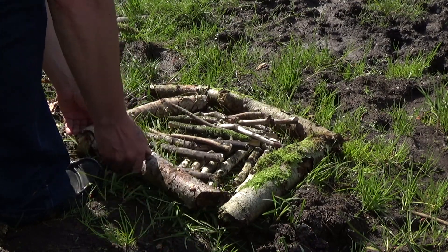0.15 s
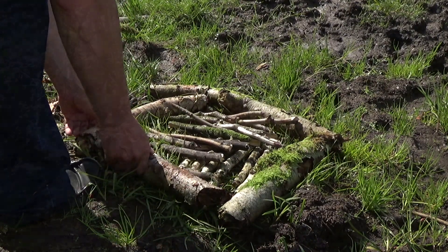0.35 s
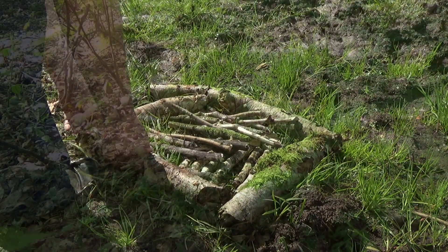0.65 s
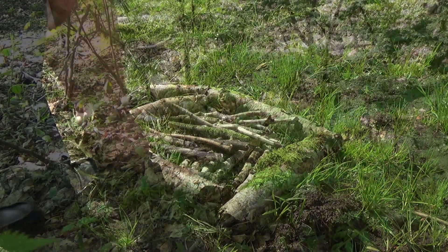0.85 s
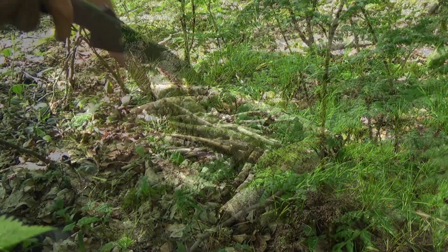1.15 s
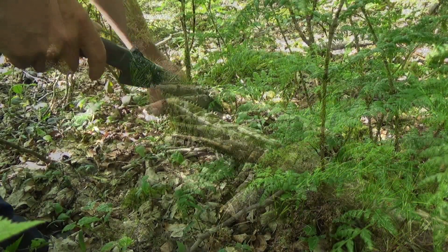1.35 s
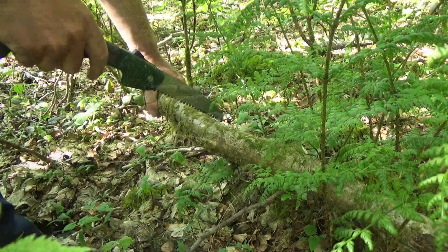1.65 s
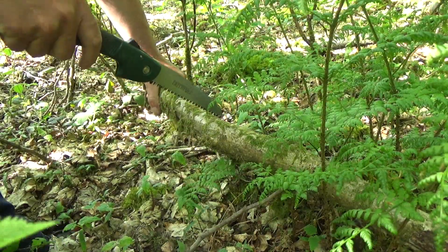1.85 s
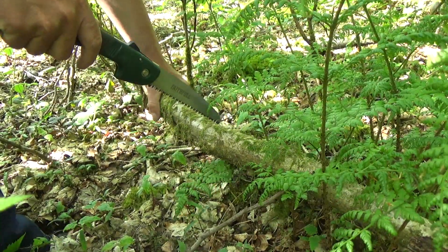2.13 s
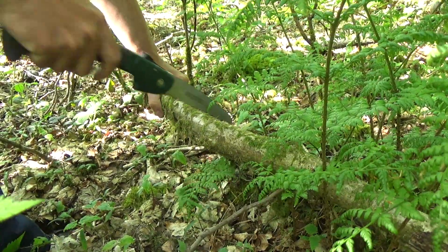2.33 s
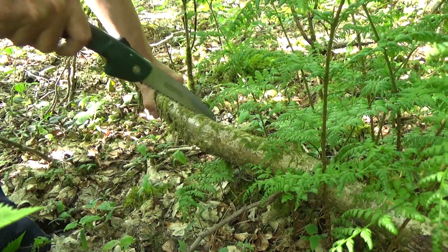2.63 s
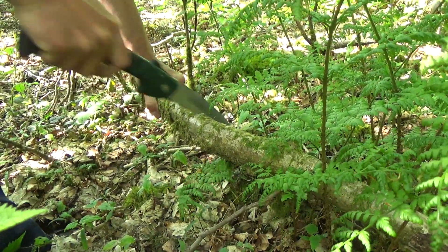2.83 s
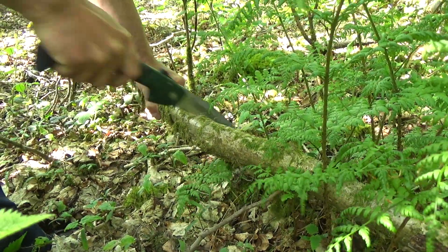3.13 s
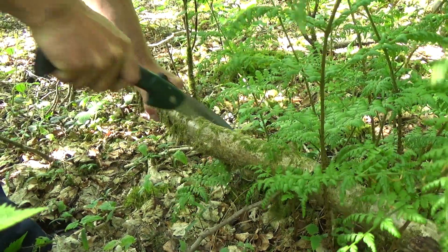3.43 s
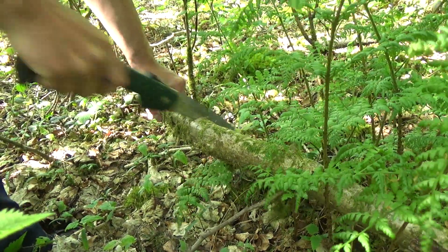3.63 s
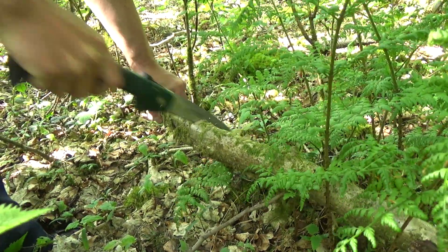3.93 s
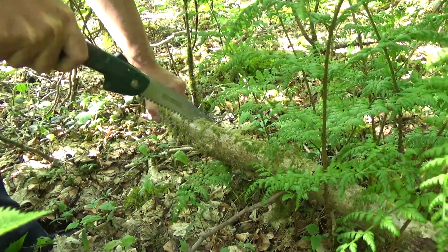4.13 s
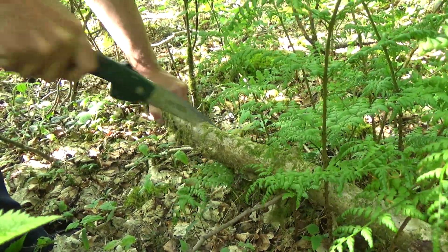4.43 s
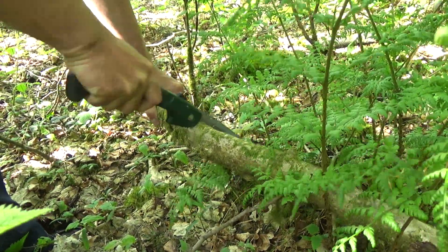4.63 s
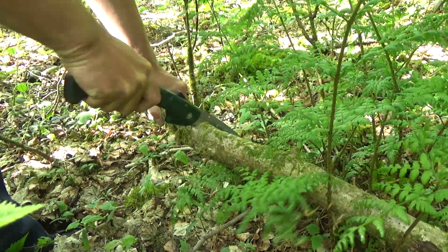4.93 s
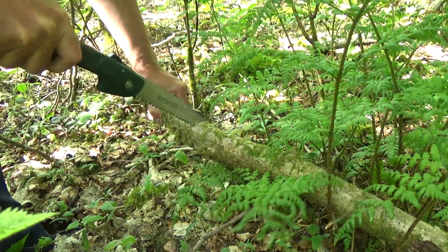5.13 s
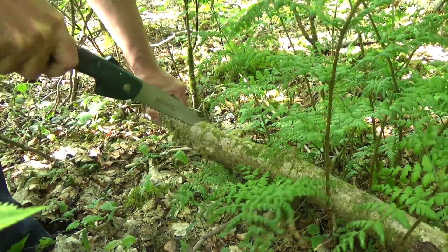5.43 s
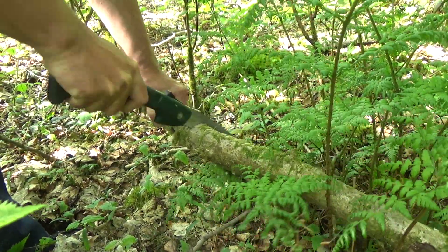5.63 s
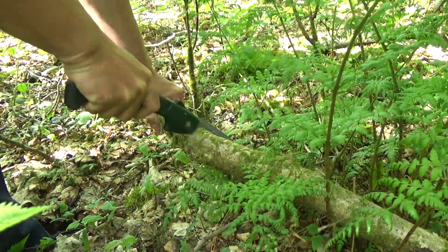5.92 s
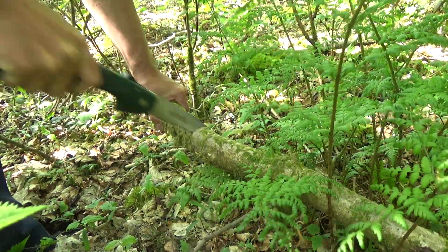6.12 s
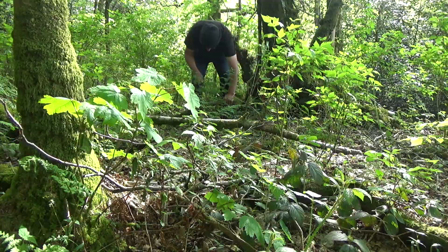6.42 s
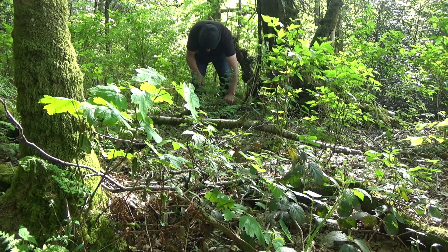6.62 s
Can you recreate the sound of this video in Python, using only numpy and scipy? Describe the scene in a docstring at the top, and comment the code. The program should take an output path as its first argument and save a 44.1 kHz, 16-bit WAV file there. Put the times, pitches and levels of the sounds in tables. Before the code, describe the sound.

Close stereo sound on a forest floor: faint breeze, leaves stirred by hands and feet, crisp twig ticks and high, sliding bird notes. Then quick sawing takes over, alternating bright, rasping pulls with return pushes that carry a short, nasal judder. Small clicks mark snagging teeth. Near the end a soft dull thump comes, and the saw drops back, faint, with a thin woodland echo.

```python
"""On a forest floor, a folding hand saw cuts a mossy branch with about three strokes to and fro a second. First
leaves rustle, twigs snap and a bird whistles gliding tones. Tooth pulses at a rate set by the blade's speed
excite resonances of wood and blade; noise and tiny random fractures make the fibres hiss. The thin blade rings
and, on most pushes, judders. The last strokes sound quieter and more hollow. Air noise lies behind all this,
first over grass, then in the crowns; the trees return diffuse tails."""
import sys
import numpy as np
from scipy import signal
from scipy.fft import rfft, irfft, next_fast_len
from scipy.io import wavfile
from scipy.ndimage import uniform_filter1d

SR = 44100
rng = np.random.default_rng(int(sys.argv[2]) if len(sys.argv) > 2 else 0)


def unload_audio(sound):
    """Save the sound as a 16-bit wav file, at the path given as the first command line argument."""
    columns = np.transpose(np.atleast_2d(sound))
    # keep every value between -1 and 1, then stretch to whole-number steps
    steps = np.round(np.clip(columns, -1, 1) * 32767)
    wavfile.write(sys.argv[1], SR, steps.astype(np.int16))


N = 298557
T = np.arange(N) / SR  # time in seconds
SIZE = next_fast_len(N + SR // 4, True)  # transform length, with room for tails
HZ = np.arange(SIZE // 2 + 1) * SR / SIZE + 1e-3  # kept above 0 for logarithms and ratios
SOFTER_FROM_S = 6.37  # from here on the saw sounds quieter, with a longer echo


def undb(db):
    """Level: turns decibels into an amplitude ratio."""
    return np.exp(np.asarray(db) * (np.log(10) / 20))


def unit(x):
    """Normalisation: scales to a root-mean-square of 1."""
    return x / np.sqrt(np.mean(np.abs(x) ** 2))


def through(x, response):
    """Linear filtering: multiplies the spectrum by a frequency response."""
    return irfft(rfft(x, SIZE) * response, SIZE)[..., :N]


def colour(points):
    """Spectral envelope: gain through (Hz, dB) points on a log-frequency axis."""
    hz, db = np.transpose(points)
    return undb(np.interp(np.log(HZ), np.log(hz), db))


def band(hz, width):
    """Simple resonance: response of one damped mode, with its width in Hz."""
    return 1 / (1 + 1j * (HZ / hz - hz / HZ) * hz / width)


def edges(low_hz, top_hz):
    """Radiation limits: a band-pass for an object that radiates mainly between two frequencies."""
    return signal.freqs(*signal.butter(3, [low_hz, top_hz], "band", analog=True), HZ)[1]


def body(modes, low_hz, top_hz):
    """Modal superposition: an object's resonances together, keeping the power of white noise."""
    resonances = sum(undb(db) * band(hz, width) for hz, width, db in modes)
    return unit(edges(low_hz, top_hz) * resonances)


def walk(rate):
    """Random modulation: a smoothed chance value, about `rate` new draws a second, rms 1."""
    size = int(SR / rate)
    steps = np.repeat(rng.standard_normal(N // size + 1), size)[:N]
    return unit(uniform_filter1d(steps, size))


def crackle(per_s, spread_db):
    """Shot noise: tiny fractures at random moments, of very unequal size."""
    happens = rng.random(N) < per_s / SR
    sizes = undb(spread_db * rng.standard_normal(N).clip(-2, 2))
    return unit(happens * rng.choice([-1, 1], N) * sizes)


def burst(t60):
    """Exponential decay: noise that falls 60 dB in t60 seconds."""
    age = T[:SR // 5]
    return .5 * rng.standard_normal(len(age)) * undb(-60 * age / t60)


def add(track, start, sound):
    """Superposition: mixes a short sound into a track at a time in seconds."""
    part = track[int(start * SR):][:len(sound)]
    part += sound[:len(part)]


def tooth_pulses(turns, scatter_db):
    """Periodic impact: one blow of its own strength each time a tooth passes."""
    at = np.flatnonzero(np.diff(np.floor(turns)) > 0)
    rate = turns[at + 1] - turns[at]  # teeth per sample
    late = (1 - turns[at] % 1) / rate
    size = undb(scatter_db * rng.standard_normal(N)[at]) / np.sqrt(rate)
    pulses = np.zeros(N)
    # each blow is shared between two samples to place it exactly
    pulses[at] += size * (1 - late)
    pulses[at + 1] += size * late
    return pulses


# the teeth sink through moss and bark into firm wood, which then answers more and more
BARK_DB, SINK_S = (-39, -5, -2.5), .24  # (wood, blade, fibre) change on the first push; time constant
LATE_DB = (-13, -18.5, -18)  # (wood, blade, fibre) change in the last strokes


def motion(strokes, peak, glide, lean_db):
    """Kinematics: blade speed 0-1, teeth passed so far, and the wood, blade and fibre gains.
    `peak` is the share of the stroke at which the blade is fastest."""
    speed, rate, db = np.zeros(N), np.zeros(N), np.zeros((3, N))
    for start, end, tooth_hz, force_db, *_ in strokes:
        now = slice(int(start * SR), int(end * SR))
        fastest = start + peak * (end - start)
        travel = np.interp(T[now], [start, fastest, end], [0, .5, 1])
        speed[now] = np.sin(np.pi * travel).clip(0)
        rate[now] = tooth_hz
        bark = np.exp(-(start - PUSHES[0][0]) / SINK_S)
        db[:, now] = force_db + bark * np.array(BARK_DB)[:, None]
        db[0, now] += lean_db * (travel - .5)  # the arm leans on the wood more as a stroke goes on
    turns = np.cumsum(rate * speed ** glide) / SR
    return speed, turns, undb(db + np.outer(LATE_DB, T > SOFTER_FROM_S))


# Modes of the taut blade.
# Each row: middle tuning in Hz, width in Hz, relative level in dB.
BLADE_MODES = [(430, 190, -16.5), (1310, 140, -17.5), (2024, 280, -6.5), (2374, 440, -6), (2766, 210, 0.5),
               (2962, 76, 7), (3056, 37, -5), (3920, 710, -9.5)]


def blade_ring(drive, shift):
    """Modal resonance: the blade's modes wander between a lower and a higher tuning.
    The cut grips the blade at changing places; `shift` is the detuning as a share of the frequency."""
    grip = np.pi / 4 * (1 + np.tanh(walk(22)))
    lower = [(hz * (1 - shift), width, db) for hz, width, db in BLADE_MODES]
    higher = [(hz * (1 + shift), width, db) for hz, width, db in BLADE_MODES]
    low_ring = through(drive * np.cos(grip), body(lower, 276, 4200))
    high_ring = through(drive * np.sin(grip), body(higher, 230, 3700))
    return low_ring + high_ring


# Spectrum of breaking wood fibres, also used for the clicks of snagging teeth.
# Each row: frequency in Hz, relative density in dB per Hz.
FIBRE_SPECTRUM = [(150, -32.5), (400, -41), (1500, -12), (3500, -4), (5000, -1.5), (6200, 0), (7400, -1.5),
                  (8500, 2.5), (9200, 0), (9900, 2.5), (11000, -3), (12200, -0.5), (14000, -8.5),
                  (16000, -15)]


def cutting(speed, turns, gains, wood_body, jitter, scatter_db, tearing, bite, wood_db, blade_db, fibre_db):
    """Forced vibration: teeth knock on the branch, and each tears a spray of fibres.
    The fibres hiss and, with the teeth, set the blade ringing."""
    wood, blade, fibre = gains
    turns = turns + jitter * speed * walk(300)  # uneven grain holds the teeth back
    teeth = tooth_pulses(turns, scatter_db)
    # fibres break most just after a tooth bites; at low speed each tooth stands out more
    bite = bite * (2 - speed)
    after_bite = undb(-bite * 20 * (turns % 1 - .5))
    spray = after_bite * undb(2.24 * walk(260)) / (1 + bite)
    blows = teeth + tearing * spray * rng.standard_normal(N)
    knock = through(blows * wood * speed ** 2.4, wood_body)
    blade_drive = 0.33 * teeth + 0.73 * spray * crackle(9000, 3.6)
    ring = blade_ring(blade_drive * blade * speed ** 1.096, shift=0.02)
    fractures = spray * crackle(20000, 3.6)
    hiss = through(fractures * fibre * speed ** 1.27, unit(colour(FIBRE_SPECTRUM)))
    return undb(wood_db) * knock + undb(blade_db) * ring + undb(fibre_db) * hiss


# Cutting strokes.
# Each row: start in seconds, end in seconds, top tooth rate in Hz, force in dB.
PULLS = [(2.49, 2.656, 280.1, -1.5), (2.812, 2.965, 282.3, 0.5), (3.128, 3.291, 344, .5),
         (3.441, 3.582, 322, .5), (3.745, 3.887, 357, 1), (4.054, 4.19, 320.3, 0),
         (4.384, 4.53, 339.8, -.5), (4.68, 4.834, 340, 0), (5.016, 5.168, 333, 0),
         (5.326, 5.487, 326.9, -1), (5.686, 5.828, 363.6, -.5), (5.979, 6.122, 376.6, .5),
         (6.294, 6.419, 354, 0), (6.617, 6.76, 377, -1)]
# Modes of the branch on the cutting stroke.
# Each row: frequency in Hz, width in Hz, relative level in dB.
WOOD_PULLED = [(255, 70, -9), (365, 100, 1), (550, 150, 2.5), (688, 120, -2), (1020, 139.4, -2.5),
               (1306, 190, 0), (1870, 443, -4)]


def pulls():
    """Forced vibration under tension: on the cutting stroke the blade is taut and the teeth bite deep."""
    speed, turns, gains = motion(PULLS, peak=.53, glide=.86, lean_db=4)
    return cutting(speed, turns, gains, body(WOOD_PULLED, 172, 2340), jitter=0.028, scatter_db=3.0,
                   tearing=0.25, bite=0.17, wood_db=-22.3, blade_db=-19.3, fibre_db=-18.5)


# Return strokes.
# Each row: start in seconds, end in seconds, top tooth rate in Hz, force in dB,
# middle of the judder in seconds (0 for none), spread of the judder in seconds.
PUSHES = [(2.31, 2.478, 395, -.5, 0, 0), (2.666, 2.807, 341.2, -1.5, 0, 0.00012),
          (2.993, 3.129, 304.2, 0, 3.057, .0066), (3.289, 3.435, 420, -.5, 3.366, 0.0055),
          (3.605, 3.756, 411.8, -.5, 3.673, .011), (3.915, 4.052, 373.5, .5, 3.977, 0.0092),
          (4.239, 4.368, 327.7, .5, 4.303, 0.016), (4.54, 4.681, 418.4, 1, 4.605, 0.011),
          (4.86, 4.997, 381.6, 0, 4.929, .014), (5.177, 5.325, 370, -1, 5.25, 0.018),
          (5.508, 5.639, 337.5, 0, 5.579, 0.019), (5.834, 5.973, 488, -.5, 5.9, .009),
          (6.139, 6.275, 396, 0, 6.215, 0.013), (6.471, 6.586, 427, -.5, 6.522, 0.0055)]
JUDDER_DRIVE_DB, LATE_JUDDER_DB = -15.5, -10  # strength at 0 dB force; its change in the last strokes


def judder(moment):
    """Instability envelope: the juddering catches quickly and holds briefly in mid-push.
    `moment` shifts it by that many spreads."""
    out = np.zeros(N)
    for _, _, _, force_db, middle, spread in PUSHES:
        if middle > PUSHES[0][0] and spread > 0:
            x = np.linspace(-4, 4, int(8 * spread * SR))  # spreads from the middle
            steepness = np.where(x < 0, 4.0, 2.4)
            swell = np.exp(-.5 * (np.abs(x) / 1.11) ** steepness)
            db = JUDDER_DRIVE_DB + force_db + LATE_JUDDER_DB * (middle > SOFTER_FROM_S)
            add(out, middle + (moment + x[0]) * spread, undb(db) * swell)
    return out


# Modes of the branch on the return stroke.
# Each row: frequency in Hz, width in Hz, relative level in dB.
WOOD_PUSHED = [(360, 60, -7), (520, 115, 1.5), (816, 62, -4.5), (987, 82, 5.5), (1167, 76, -4.5),
               (1356, 76, -8), (1870, 130, 0.5)]
# Modes of the buckled blade.
# Each row: frequency in Hz, width in Hz, relative level in dB,
# moment at which its drive is strongest, in spreads from the middle of the judder.
BUCKLED_MODES = [(780, 102, -4.5, 3.5), (940, 120, -1.5, 1.5), (1156, 49, -6, 0), (1105, 110, -3.5, -0.2),
                 (1356, 230, -4, -0.16), (1946, 400, 0.5, -0.38), (2736, 300, 0, 0.43), (2910, 150, 3, 0.4)]


def pushes():
    """Buckling: on the return stroke the blade hops from tooth to tooth, scraping less while it does."""
    speed, turns, gains = motion(PUSHES, peak=.57, glide=.8, lean_db=12)
    buckle = judder(0)
    contact = 1 / (1 + 3.5 * buckle)
    hop_turns = turns + .008 * speed * walk(250)
    hops = tooth_pulses(hop_turns, scatter_db=1.3) + 0.15 * rng.standard_normal(N)
    # the free length of blade changes along the stroke, so its modes ring one after another
    modes = 0
    for hz, width, db, moment in BUCKLED_MODES:
        drive = hops * speed ** 0.73 * judder(moment)
        modes = modes + rfft(drive, SIZE) * undb(db) * band(hz, width)
    squawk = irfft(modes * edges(715, 2770), SIZE)[:N]
    shove = through(buckle * rng.standard_normal(N), unit(band(71, 135) ** 2))  # the branch rocks
    scrape = cutting(speed, turns, gains * contact, body(WOOD_PUSHED, 295, 2380), jitter=.04,
                     scatter_db=3.0, tearing=0.41, bite=0.33, wood_db=-25.8, blade_db=-22.0, fibre_db=-20)
    return scrape + undb(12) * squawk + undb(-45) * shove


# Teeth that snag as the blade turns round.
# Each row: time in seconds, strength in dB, drive of the wood knock in dB relative to it
# (before a common cut of 10.5 dB; the click has one of 3 dB).
SNAGS = [(2.683, -12, -30), (2.829, -20, -25), (3.019, -15, -12), (3.6055, -13, -27), (4.0743, -9, -12),
         (4.2417, -12.5, -27), (4.3923, -14, 8), (4.409, -2, -5), (4.6982, -11, -6), (4.8817, -13, -21),
         (5.027, -8.5, 1), (5.2023, -9, -26), (5.3062, -6.5, 2), (5.3554, -15, 4), (5.7014, -7, 2),
         (6.3135, -15, -12)]


def snags():
    """Impulsive release: single teeth catch and let go with a click and a knock of the wood.
    Smaller ticks run through the sawing."""
    clicks, knocks = np.zeros(N), np.zeros(N)
    for s, db, knock_db in SNAGS:
        crack = undb(db) * burst(t60=0.013)
        add(clicks, s, undb(-3) * crack)
        add(knocks, s, undb(knock_db - 10.5) * crack)
    sawing = (T > PUSHES[0][0]) & (T < SOFTER_FROM_S)
    ticks = undb(-46.5) * sawing * crackle(250, 4.5)
    bright = through(clicks + ticks, unit(colour(FIBRE_SPECTRUM)))
    return bright + through(knocks + 0.45 * ticks, body(WOOD_PULLED, 120, 2300))


# the open grass gives way to the trees
TREES_FROM_S, TREES_BY_S = .35, 1.9
# Dry leaves and grass stirred by hands and feet.
# Each row: start in seconds, attack in seconds, hold in seconds, drive in dB, fading in dB per second.
RUSTLES = [(0, 0.004, .005, -45, 120), (.12, .045, .005, -42, 80), (.505, .04, .04, -43.5, 35),
           (1.004, .016, .13, -31, 85), (1.29, .02, .04, -44, 18), (1.95, 0.066, .04, -43.5, 25)]
# Spectrum of the leaves.
# Each row: frequency in Hz, relative density in dB per Hz.
LEAF_SPECTRUM = [(120, -44), (200, -26.5), (245, -7.5), (380, -30), (777, -8.5), (867, -14.5), (2420, -4.5),
                 (6400, -4.5), (9230, -1), (11100, -3.5), (16000, -22)]
# Twigs that snap and are set down.
# Each row: time in seconds, peak in dB (before a common cut of 1.5 dB), nominal centre in Hz,
# decay by 60 dB in seconds (before the band filter).
TWIGS = [(.159, -19, 5500, .063), (.608, -31.5, 1100, 0.024), (1.007, -24, 8040, 0.043),
         (1.303, -23, 900, 0.021), (1.304, -27, 3500, .015), (1.344, -26, 3780, .016),
         (1.569, -21, 10300, .053), (1.589, -24, 10000, 0.075), (1.763, -10.5, 9500, .032),
         (1.886, -24.5, 9500, .012), (1.940, -18.5, 6500, .03), (2.237, -28.5, 2700, .018),
         (2.309, -29.5, 4460, .03)]


def undergrowth():
    """Stochastic fracture: leaves crackle at each stir of hands and feet and settle; twigs snap."""
    stir = np.zeros(N)
    age = T[:int(0.65 * SR)]  # longest that one stir lasts
    for s, attack, hold, db, fade_db_per_s in RUSTLES:
        fading = fade_db_per_s * (age - attack - hold).clip(0)
        add(stir, s, np.minimum(age / attack, 1) * undb(db - fading))
    grains = undb(-2.0) * crackle(3500, 9.9) + undb(-3.5) * rng.standard_normal(N)
    leaves = through(stir * grains * undb(1.7 * walk(70)), unit(colour(LEAF_SPECTRUM)))
    twigs = np.zeros(N)
    for s, db, hz, t60 in TWIGS:
        limits = [hz / 1.47, min(hz * 1.62, .45 * SR)]
        snap_filter = signal.butter(2, limits, "band", fs=SR, output="sos")
        snap = signal.sosfilt(snap_filter, burst(t60))
        add(twigs, s, undb(db) * snap / np.abs(snap).max())
    handling = (T > TREES_BY_S) & (T < PUSHES[0][0])  # the saw is set on the branch
    ticks = through(handling * crackle(45, 4.0), unit(colour(LEAF_SPECTRUM)))
    return leaves + undb(-1.5) * twigs + undb(-53.5) * ticks


def thump():
    """Low-frequency pulse: a soft, dull thump just before the saw grows quieter."""
    pulse = np.zeros(N)
    add(pulse, 6.366, undb(-33) * np.hanning(SR // 200))
    return through(pulse, band(67.5, 160.5))


# Whistled notes.
# Each row: start in seconds, length in seconds, first pitch in Hz, last pitch in Hz,
# relative level in dB, trill depth in Hz (a negative depth swings downwards first).
NOTES = [(0.622, 0.036, 3000, 3110, -45, -3), (.662, .068, 3620, 3260, -39.5, -4),
         (.805, .115, 3350, 2940, -38, 0), (1.353, .032, 3300, 3480, -38, 0),
         (1.398, .066, 4500, 4030, -34.5, -5), (1.555, .08, 3550, 3830, -49, 0),
         (1.668, .08, 3400, 2760, -33.5, 0), (1.722, .148, 3000, 2900, -32, 140),
         (2.074, .065, 3150, 3176, -31, 0), (2.14, 0.046, 3600, 3150, -39, 0),
         (2.171, 0.059, 2950, 2300, -42, 0), (2.219, 0.055, 2500, 2650, -45.5, 0),
         (6.427, 0.07, 4600, 5124, -55, 0), (6.594, 0.053, 2560, 2400, -45, 0)]
SLUR, TRILL_HZ = 2.43, 23.0  # time constants of pitch glide in a note; trills a second


def bird():
    """Frequency modulation: nearly pure whistles swell, slur towards a last pitch and may trill.
    They waver on their way through the foliage."""
    song = np.zeros(N)
    waver = 1 + 0.0075 * walk(200)
    for s, length, first_hz, last_hz, db, trill_hz in NOTES:
        age = T[:int(length * SR)]
        slur = (first_hz - last_hz) * np.exp(-SLUR * age / length)
        trill = trill_hz * np.sin(2 * np.pi * TRILL_HZ * age)
        hz = last_hz + slur + trill
        turns = np.cumsum(hz * waver[int(s * SR):][:len(age)]) / SR
        swell = np.sqrt(2) * undb(db) * signal.windows.tukey(len(age), .6)
        add(song, s, swell * np.sin(2 * np.pi * turns))
    return song * undb(1.8 * walk(80))


# Phase between two close receiving points.
# Each row: frequency in Hz, lead of the left in radians.
LEFT_LEAD = [(0, 0.18), (1210, -0.44), (1640, -0.14), (1890, -0.34), (3450, 0.016), (16100, -0.044)]
# Stereo width of the scattering near the ground.
# Each row: frequency in Hz, side relative to mid in dB (before a common cut of 2.7 dB).
GROUND_WIDTH = [(60, -33), (110, -34), (200, -19), (380, -19.5), (700, -9.5), (1290, -6.5), (2380, -16.5),
                (4400, -23.5), (8120, -12), (15000, -49)]


def ports(x):
    """Phase difference: of two close ports, the left hears the middle range a little later.
    The ground reaches each differently."""
    lead = np.interp(HZ, *np.transpose(LEFT_LEAD))
    scatter = burst(t60=0.061)
    scattered = rfft(scatter / np.linalg.norm(scatter), SIZE)
    side = undb(-2.7) * colour(GROUND_WIDTH) * scattered
    return through(x, np.array([np.exp(.5j * lead) + side, np.exp(-.5j * lead) - side]))


# Stereo width of sound from all round.
# Each row: frequency in Hz, side relative to mid in dB (in the tails 2 dB less).
DIFFUSE_WIDTH = [(60, -27), (110, -25), (200, -17), (380, -12), (700, -10.5), (1290, -8), (2380, -8.5),
                 (4400, -7.5), (8120, -7), (15000, -16)]


def trees(x, t60, dull_hz):
    """Diffuse scattering: trunks and leaves return a thin, dull, exponentially decaying tail."""
    age = T[:SR]
    decay = undb(-60 * age / t60) * (1 - np.exp(-age / 0.004))
    tails = rng.standard_normal((2, SR)) * decay
    mid, side = rfft(tails / np.linalg.norm(tails[0]), SIZE) / (1 + (HZ / dull_hz) ** 2)
    side = side * undb(-2) * colour(DIFFUSE_WIDTH)
    return through(x, np.array([mid + side, mid - side]))


# Spectrum of the air over the grass.
# Each row: frequency in Hz, relative density in dB per Hz.
GRASS_SPECTRUM = [(15, -71), (25, -46), (97, -13), (405, -3), (1440, -4.5), (1610, -11), (1740, -5.5),
                  (2050, -11), (2280, -12), (4870, -16), (9070, -11.5), (16000, -30)]
# Spectrum of the air in the crowns.
# Each row: frequency in Hz, relative density in dB per Hz.
CROWN_SPECTRUM = [(15, -54), (25, -32), (64, -22), (309, -13.5), (1130, -4.5), (1440, -11.5), (2350, -8),
                  (2910, 0), (4370, -10), (10400, -9), (13600, -15), (16000, -20)]
GRASS_DB, GRASS_LEFT_DB = -52, -63.5  # nominal level before and after the trees take over
CROWNS_DB, LATE_CROWNS_DB = -49.5, -54.5  # nominal level before and after the saw grows quieter


def breeze():
    """Broadband flow noise: a soft, slowly changing wash of air, first over the grass, then in the crowns."""
    wooded = np.interp(T, (TREES_FROM_S, TREES_BY_S), [0, 1])
    grass = (1 - wooded) * undb(GRASS_DB) + wooded * undb(GRASS_LEFT_DB)
    crowns_db = np.where(T < SOFTER_FROM_S, CROWNS_DB, LATE_CROWNS_DB)
    crowns = np.maximum(wooded, .17) * undb(crowns_db)  # faint in the open too
    air = rng.standard_normal((2, N)) * undb(walk(4.1))
    over_grass = grass * through(air, unit(colour(GRASS_SPECTRUM)))
    mid, side = over_grass + crowns * through(air, unit(colour(CROWN_SPECTRUM)))
    return mid + np.array([[1], [-1]]) * through(side, colour(DIFFUSE_WIDTH))


def scene():
    """Direct and diffuse fields: saw and undergrowth close by, the bird among the trees."""
    saw = pulls() + pushes() + snags()
    near = saw + undergrowth() + thump()
    song = bird()
    direct = ports(near + undb(-1.5) * song)
    ground = undb(-8.5) * trees(near, t60=0.029, dull_hz=3000)
    forest = undb(-26.5) * trees(near, t60=0.33, dull_hz=5950)
    late_echo = undb(-15) * trees(saw * (T > SOFTER_FROM_S), t60=0.42, dull_hz=6100)
    song_tail = undb(-4.5) * trees(song, t60=0.39, dull_hz=9000)
    return direct + ground + forest + late_echo + song_tail + breeze()


def record(dry):
    """Saturation and band limiting: rounds the loudest peaks and cuts steeply above 15.9 kHz."""
    ceiling = undb(-1.0)
    rounded = ceiling * np.tanh(dry / ceiling)
    return signal.sosfilt(signal.ellip(10, .2, 70, 15900, fs=SR, output="sos"), rounded)


dry = scene()
out = record(dry)
unload_audio(out)
```